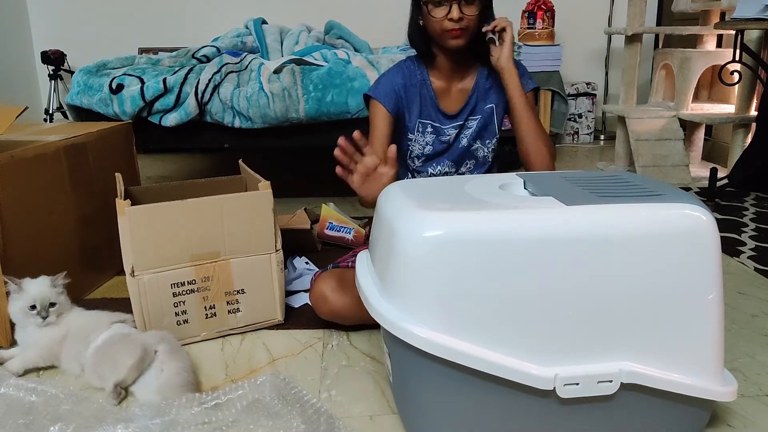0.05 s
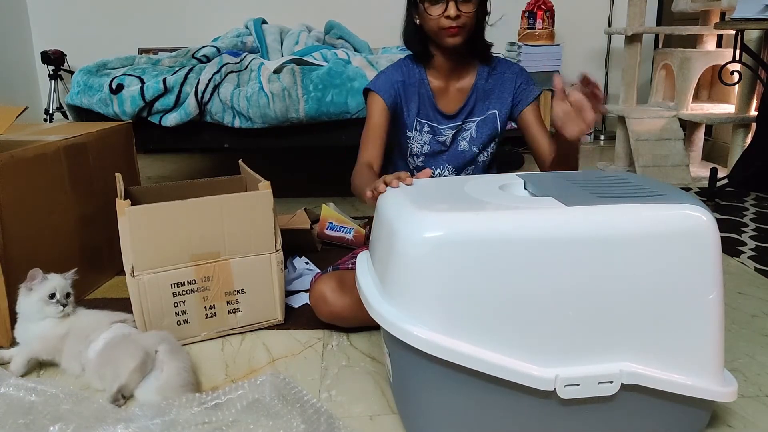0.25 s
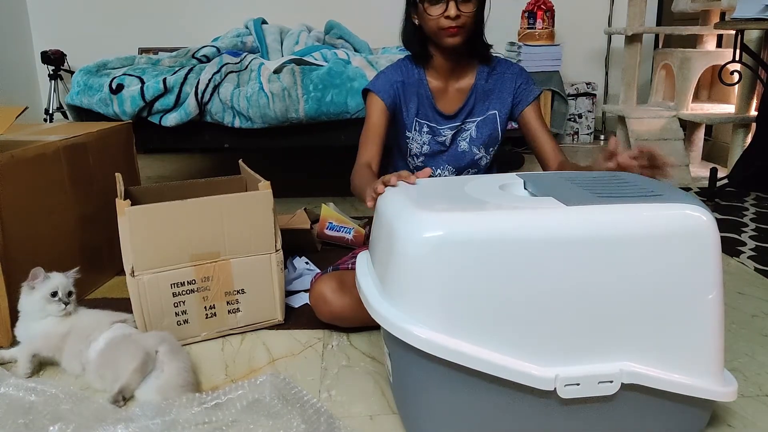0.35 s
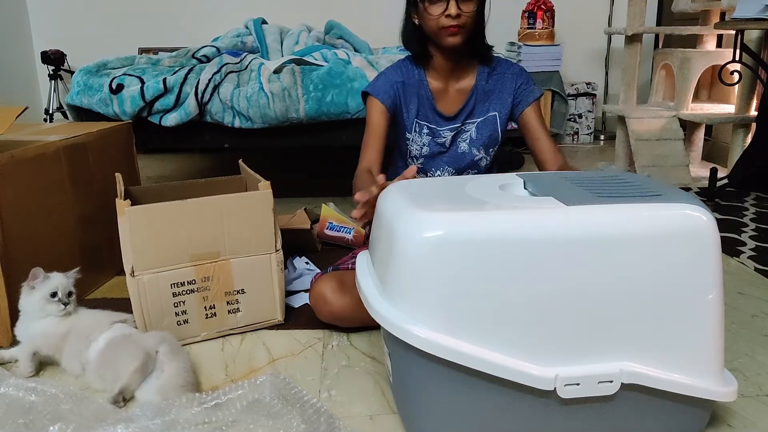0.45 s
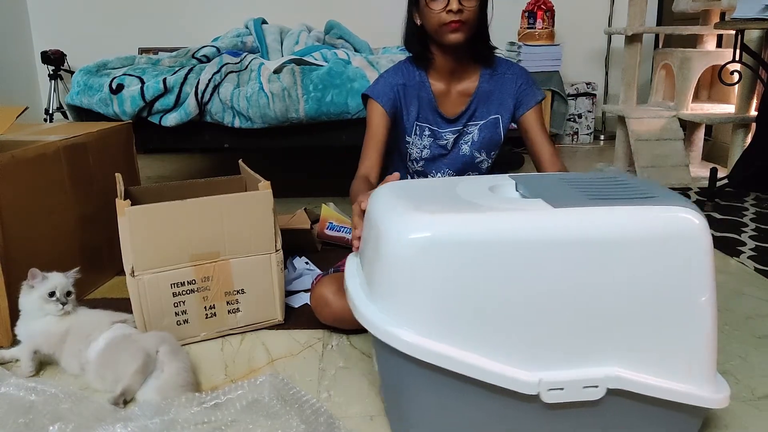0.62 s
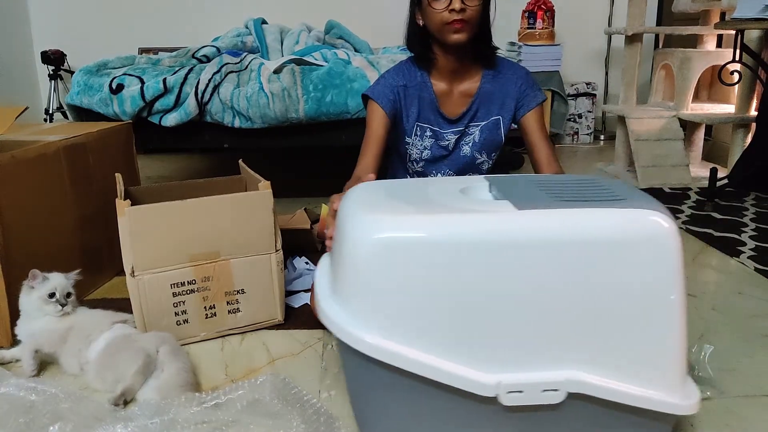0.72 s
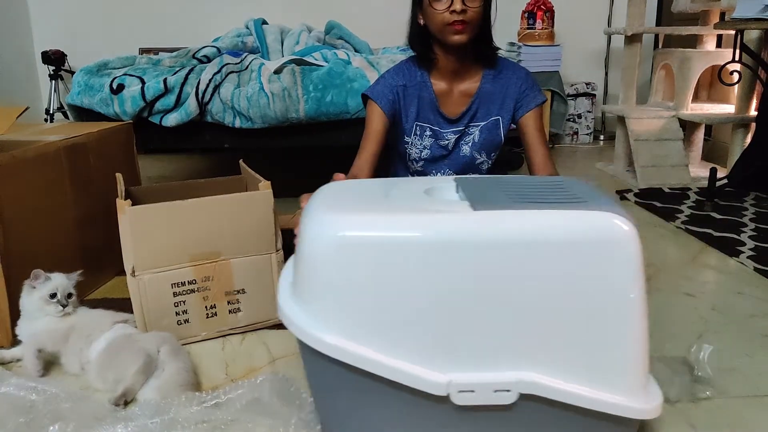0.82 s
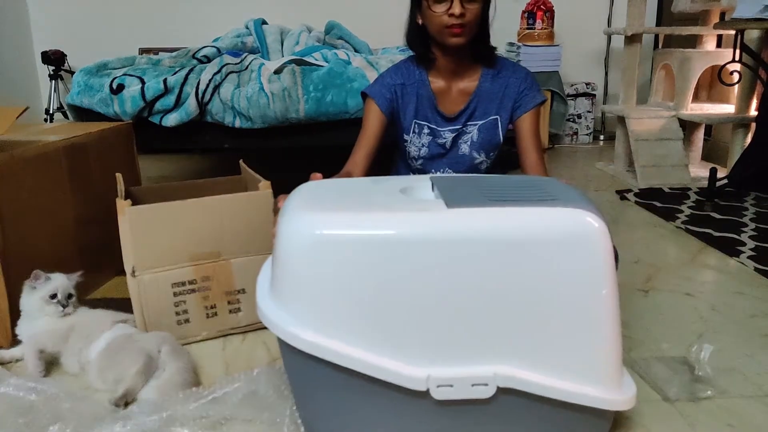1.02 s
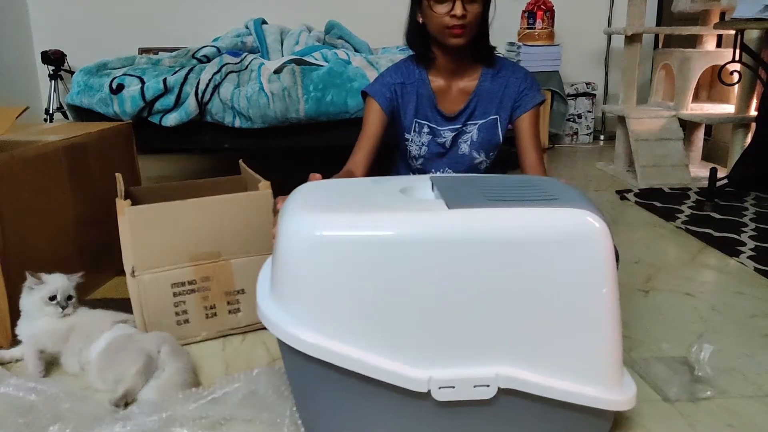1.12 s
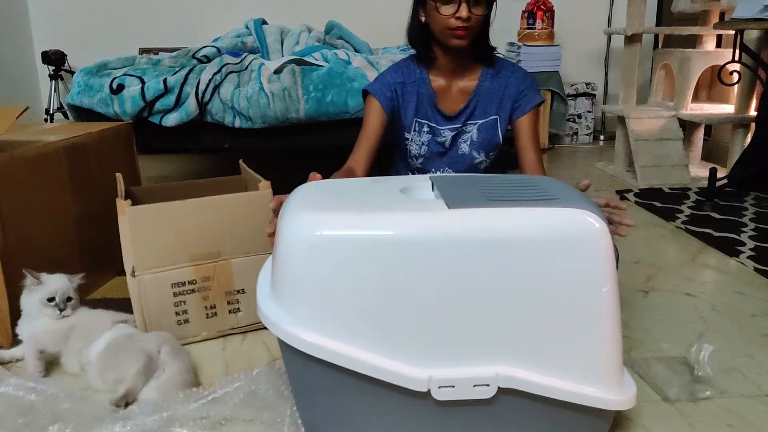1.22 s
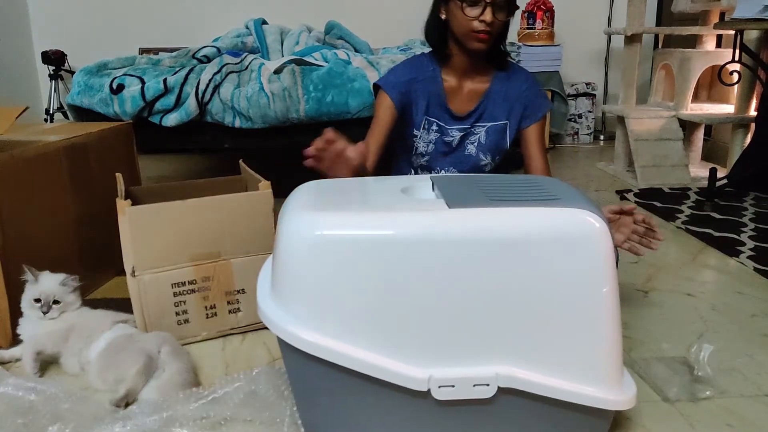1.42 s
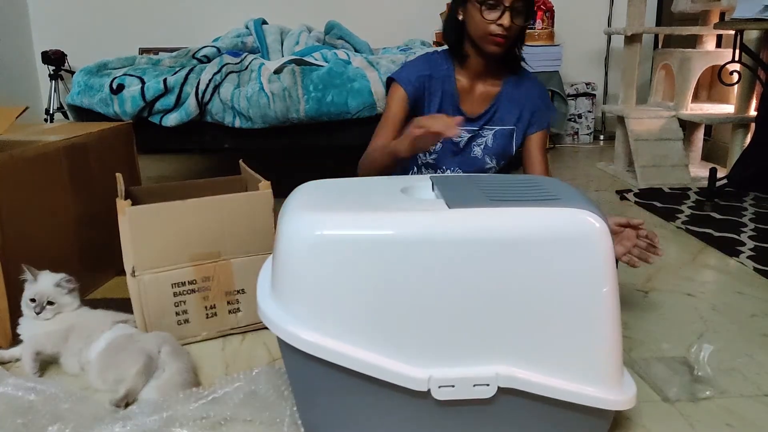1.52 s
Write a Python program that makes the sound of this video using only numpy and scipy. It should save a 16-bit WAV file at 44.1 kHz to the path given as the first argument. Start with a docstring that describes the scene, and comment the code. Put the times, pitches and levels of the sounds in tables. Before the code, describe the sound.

Hollow plastic box thumps under the hands, then scrapes briefly across a tiled floor.

```python
"""A hollow plastic litter box is grabbed with one hand, then the other, and slid round on a tiled floor.
Each blow makes a panel thump, sets the box and the room booming and rattles the hood, on which
nails tick. Friction makes the base hiss over grit, judder, squeal faintly and squeak once by stick-slip
before it settles. A small hard room reverberates behind it, heard by two unlike microphones."""
import sys
import numpy as np
from scipy import signal
from scipy.fft import rfft, irfft
from scipy.io import wavfile
from scipy.ndimage import uniform_filter1d

SR = 44100
rng = np.random.default_rng(int(sys.argv[2]) if len(sys.argv) > 2 else 0)


def dump_mix(stems):
    """Bounce the given channels to the path in sys.argv[1] as a 16-bit WAV at rate SR."""
    frames = np.atleast_2d(stems).T  # one column per channel
    limited = np.clip(frames, -1, 1)  # hard clip at full scale
    pcm = np.round(limited * 32767).astype(np.int16)
    wavfile.write(sys.argv[1], SR, pcm)


N = 68355
T, HZ = np.arange(N) / SR, np.fft.rfftfreq(2 * N, 1 / SR)

# Blows of the hands and bumps of the base. Each row: start in seconds, panel level in dB, panel pitch
# in Hz, panel swell in seconds, boom gain in dB, rattle gain in dB, rattle rise in seconds.
BLOWS = [(0.2237, -17.5, 184.5, 0.015, -21, -31, 0.0024), (0.284, -25, 174.3, 0.021, -41, -56, 0.0062),
         (0.417, -29.5, 180, 0.0063, -63, -69.5, 0.0045), (0.512, -29.5, 171, 0.0052, -30.5, -32, 0.024),
         (0.538, -26, 190, 0.0049, -35, -35, 0.011), (0.5591, -13.5, 175.6, 0.0079, -27.5, -57, 0.0043),
         (0.627, -23.5, 169, 0.0082, -43, -61, 0.0046), (0.745, -32.5, 199, 0.0097, -69, -65, .005),
         (0.831, -33, 181, 0.011, -51, -70, 0.0063), (0.861, -40, 332, 0.0038, -43, -43, 0.0017),
         (0.926, -35.5, 174, 0.014, -69, -44.5, 0.0039), (1.1189, -29.5, 170.4, 0.0082, -35.5, -62, .003),
         (1.315, -40.5, 94.4, 0.0057, -52, -66, .005)]


def amp(db):
    """Converts decibels to an amplitude ratio."""
    return 10 ** (np.asarray(db) / 20)


def unit(x):
    """Normalises to rms 1."""
    return x / np.sqrt(np.mean(x ** 2) + 1e-20)


def since(start):
    """Seconds elapsed since an onset, zero before it."""
    return np.maximum(T - start, 0)


def curve(points, hz=HZ):
    """Interpolates a table on a logarithmic frequency axis."""
    f, value = np.transpose(points)
    return np.interp(np.log(hz + 1), np.log(f), value)


def colour(x, db):
    """Minimum-phase filter: folding the cepstrum makes the given gain curve causal."""
    cepstrum = irfft(np.log(amp(np.maximum(db, -100))))
    cepstrum[1:N] *= 2
    cepstrum[N + 1:] = 0
    return irfft(rfft(x, 2 * N) * np.exp(rfft(cepstrum)))[..., :N]


def wobble(samples):
    """Random modulation of rms 1: noise smoothed twice over the given number of samples."""
    return unit(uniform_filter1d(uniform_filter1d(rng.standard_normal(N), samples), samples))


def grains(per_s, spread_db=3):
    """Shot noise: tiny independent impacts of uneven size."""
    impacts = rng.standard_normal(N) * (rng.random(N) < per_s / SR)
    return unit(impacts * amp(spread_db * np.minimum(rng.exponential(1, N), 4)))


def diffuse_noise():
    """A diffuse field at two close microphones is coherent in the bass and incoherent in the treble."""
    # Each row: frequency in Hz, left-right correlation.
    coherence = [(30, 0.84), (150, 0.91), (300, 0.66), (550, 0.32), (1000, 0), (2000, 0), (16000, 0)]
    alike = curve(coherence)
    mid, side = rfft(rng.standard_normal((2, 2 * N)))
    mid, side = mid * np.sqrt((1 + alike) / 2), side * np.sqrt((1 - alike) / 2)
    return irfft(np.array([mid + side, mid - side]))[:, :N]


def background(hum_hz=38, hum_db=-52, waver=0.1, noise_db=-55):
    """Ambient noise: a faint diffuse field and a deep hum that wavers in amplitude and phase."""
    # The still room. Each row: frequency in Hz, relative spectral density in dB.
    spectrum = [(15, -47.5), (28, 6), (39, -5), (52, -2.5), (80, -5), (120, -18.5), (200, -12.5),
                (350, -23.5), (800, -28), (2000, -30), (5000, -35.5), (10000, -37.5), (16000, -33)]
    envelope = amp(hum_db) * (1 + waver * wobble(samples=5000))
    hum = envelope * np.sin(2 * np.pi * hum_hz * T + waver * wobble(samples=5000))
    return hum + amp(noise_db) * unit(colour(diffuse_noise(), curve(spectrum)))


def room(x, gap_s=0.0014):
    """Reverberation: after a short gap, each band of the tiled room decays exponentially."""
    # Each row: frequency in Hz, time to fall by 60 dB in seconds.
    decay_times = [(100, 0.54), (400, 0.62), (1000, 0.39), (3000, 0.48), (7000, 0.38), (15000, 0.37)]
    # Each row: frequency in Hz, gain of the reverberation in dB.
    gains = [(80, -19.5), (200, -7.5), (400, -6.5), (1000, 2), (4000, 2.5), (15000, 3)]
    hz, t, bands = signal.stft(diffuse_noise(), SR, nperseg=256)
    decay = amp(-60 * t / curve(decay_times, hz)[:, None])
    tail = signal.istft(bands * decay, SR, nperseg=256)[1][:, :N]
    tail *= np.clip(T / gap_s - 1, 0, 1)
    tail = colour(unit(tail) / np.sqrt(N), curve(gains))
    return signal.fftconvolve(x[None], tail, axes=1)[:, :N]


def moving_room(x, patterns=5, cycle_hz=4):
    """Reflections depend on position: the travelling box crossfades from one pattern to the next."""
    cycles = cycle_hz * T + np.arange(patterns)[:, None] / patterns
    shares = np.maximum(np.cos(2 * np.pi * cycles), 0) ** 2
    shares /= np.linalg.norm(shares, axis=0)  # constant power
    return sum(room(x * share) for share in shares)


def nail_ticks(rise_s=0.00036):
    """Brief contacts have broad, bright spectra; returns the direct sound and the feed to the room."""
    # Nails and fingertips on the hood. Each row: start in seconds, level in dB, centre in Hz,
    # half-width in octaves, relative feed to the room in dB.
    contacts = [(0.1069, -47.5, 4800, 1.15, 5), (0.219, -36, 5830, 0.66, 6.5),
                (0.2234, -22.5, 6540, 0.36, -2.5), (0.227, -37, 10000, 0.62, 9.5),
                (0.529, -33.5, 6480, 1.5, 9), (0.5348, -29.5, 8700, 0.21, -10),
                (1.229, -58, 6000, 1.2, 13.5), (1.429, -58.5, 8500, 0.35, 8)]
    direct, to_room = np.zeros((2, N))
    for start, db, hz, octaves, room_db in contacts:
        age = since(start) / rise_s
        burst = rng.standard_normal(N) * age * np.exp(1 - age)
        impulse = signal.unit_impulse(N, round(start * SR))
        band_db = -10 * np.log10(1 + (np.log2((HZ + 1) / hz) / octaves) ** 4)
        gain = amp(db) * np.sqrt(rise_s * SR / N)
        direct += gain * unit(colour(burst, band_db))
        to_room += gain * amp(room_db) * unit(colour(impulse, band_db))
    return direct, to_room


def squeak(start_s=0.957, length_s=0.032, start_hz=452, rise_hz_per_s=2700, jitter=0.0599, rasp=0.6):
    """Stick-slip oscillation: the slowing base gives a short, rough, rising chirp."""
    # Each entry: level of a harmonic in dB, from the fundamental up.
    harmonics = [-38.5, -42.5, -45.5, -60.5, -57, -47.5]
    t = since(start_s)
    hz = (start_hz + rise_hz_per_s * t) * (1 + jitter * wobble(samples=40))
    phase = 2 * np.pi * np.cumsum(hz) / SR
    arch = abs(np.sin(np.pi * np.minimum(t / length_s, 1) ** 0.81))
    envelope = arch * (1 + rasp * wobble(samples=50))
    return envelope * sum(amp(db) * np.sin(k * phase) for k, db in enumerate(harmonics, 1))


def slide(squeal_s=0.788, squeal_half_s=0.022, squeal_hz=5200, squeal_half_hz=1100, squeal_db=-41):
    """Sliding friction over grit: a fine hiss, a low judder of the shell and a brief thin squeal."""
    # The course of the slide. Each row: time in seconds, hiss level in dB, judder level in dB.
    levels = [(0.469, -61, -54), (0.53, -59, -46), (0.582, -49.5, -37), (0.661, -39.5, -35),
              (0.75, -37, -40.5), (0.80, -36.5, -43.5), (0.868, -35.5, -39.5), (0.94, -44.5, -44),
              (0.99, -43.5, -41.5), (1.08, -60, -35.5), (1.16, -66.5, -42), (1.23, -66, -45),
              (1.36, -85, -62)]
    # Each row of both spectra: frequency in Hz, relative spectral density in dB.
    hiss_spectrum = [(150, -5.5), (400, 2.5), (1000, -3.5), (2000, -3), (3200, -4.5), (5000, -1), (7500, 0),
                     (10000, -0.5), (13000, -5.5), (16000, -6)]
    judder_spectrum = [(20, -27), (40, 4), (62, -5.5), (100, 2.5), (135, -3), (185, 1), (225, -6),
                       (290, -19.5), (550, -23.5), (1000, -31), (3000, -40.5), (12000, -100)]
    times, hiss_db, judder_db = np.transpose(levels)
    hiss = unit(colour(grains(per_s=14000), curve(hiss_spectrum)))
    hiss *= amp(np.interp(T, times, hiss_db, left=-np.inf))
    judder = unit(colour(rng.standard_normal(N), curve(judder_spectrum)))
    judder *= amp(np.interp(T, times, judder_db, left=-np.inf))
    band_db = -20 * np.log10(1 + ((HZ - squeal_hz) / squeal_half_hz) ** 2)
    squeal = unit(colour(rng.standard_normal(N), band_db))
    squeal *= amp(squeal_db) * np.exp(-((T - squeal_s) / squeal_half_s) ** 2)
    return hiss + judder + squeal


def hood_rattle(fade_s=0.028):
    """Contact chatter: after each blow the hood strikes its base in a fading swarm of tiny impacts."""
    # Each row: frequency in Hz, relative spectral density in dB.
    spectrum = [(60, -18), (180, 8.5), (330, 16.5), (600, 9.5), (1000, 0), (2000, -5.5), (3500, -11.5),
                (6000, -16), (10000, -8.5), (16000, -66)]
    envelope = np.zeros(N)
    for start, *_, db, rise_s in BLOWS:
        t = since(start)
        envelope += amp(db) * (1 - np.exp(-t / rise_s)) * np.exp(-t / fade_s)
    return envelope * unit(colour(grains(per_s=6600), curve(spectrum)))


def box_and_room_boom(rise_s=0.028):
    """Modal resonance: each blow sets the hollow box and the room booming in low, slowly fading tones."""
    # Each row: frequency in Hz, relative level in dB, time to fall by 60 dB in seconds.
    modes = [(86.5, -6, 0.58), (108.6, -5, 0.39), (145.25, 3.5, 0.39), (194.8, -11, 0.46), (228, -10, 0.6),
             (331, -5, 0.21), (358, -15.5, 0.41), (440.4, -4, 0.1), (555.5, -8.5, 0.2), (613, -22, 0.45)]
    boom = np.zeros(N)
    for start, *_, boom_db, _, _ in BLOWS:
        t = since(start)
        ring = sum(amp(db - 60 * t / t60) * np.sin(2 * np.pi * hz * t) for hz, db, t60 in modes)
        boom += amp(boom_db) * (1 - np.exp(-t / rise_s)) * ring
    return boom


def panel_thumps(swell_shape=2.27, overtone_ratio=2.7, overtone_db=-26.5):
    """Damped vibration: each blow swings a panel for a few cycles, with a weak inharmonic overtone."""
    thumps = np.zeros(N)
    for start, db, hz, swell_s, *_ in BLOWS:
        t = since(start)
        age, phase = t / swell_s, 2 * np.pi * hz * t
        envelope = amp(db) * (age * np.exp(1 - age)) ** swell_shape
        thumps += envelope * (np.cos(phase) + amp(overtone_db) * np.sin(overtone_ratio * phase))
    return thumps


def scene(slide_direct_db=-6, squeak_room_db=-4):
    """Direct and reflected sound add: the box is close, its screened base heard mostly reflected."""
    knocks = panel_thumps() + hood_rattle()
    ticks, ticks_to_room = nail_ticks()
    drag, chirp = slide(), squeak()
    blows = knocks + box_and_room_boom()
    blows = np.array([blows, np.roll(blows, -2)])  # arrives two samples earlier on the right
    direct = blows + ticks + chirp + amp(slide_direct_db) * drag
    reflected = room(knocks) + room(ticks_to_room + amp(squeak_room_db) * chirp) + moving_room(drag)
    return direct + reflected + background()


def record(dry, cutoff_hz=15850):
    """Frequency response: each microphone has its own treble resonance; a low-pass limits the band."""
    # Each row of both responses: frequency in Hz, gain in dB.
    left_response = [(1000, 2), (3500, 3), (4900, 0.5), (5600, 6), (6200, 4.5), (7000, -5), (8200, -6),
                     (10000, -9), (12000, -10), (16000, -8)]
    right_response = [(1000, 2.5), (5500, 2), (6200, -4), (7300, -0.5), (8200, -4), (9000, 3), (9550, 7.5),
                      (10200, 2), (11000, -3), (12000, -5), (16000, -5)]
    heard = np.array([colour(dry[0], curve(left_response)), colour(dry[1], curve(right_response))])
    low_pass = signal.firwin(511, cutoff_hz, window=("kaiser", 9), fs=SR)
    return signal.oaconvolve(heard, low_pass[None], "same")


dry = scene()
out = record(dry)
dump_mix(out)
```